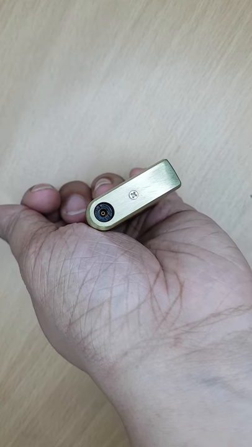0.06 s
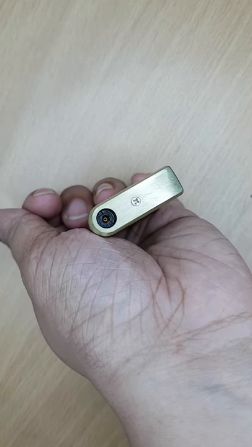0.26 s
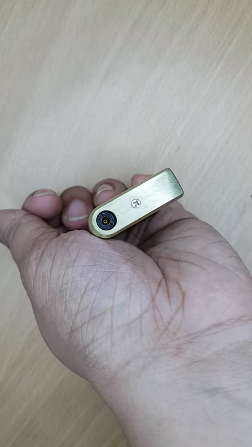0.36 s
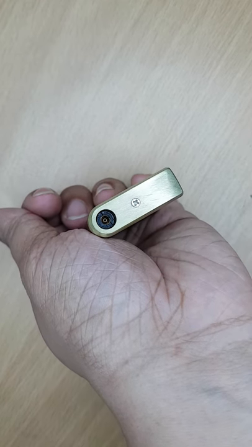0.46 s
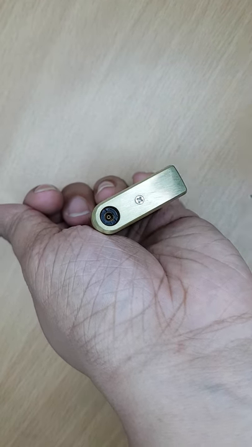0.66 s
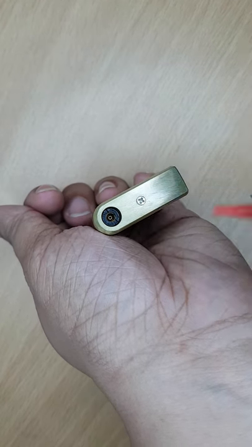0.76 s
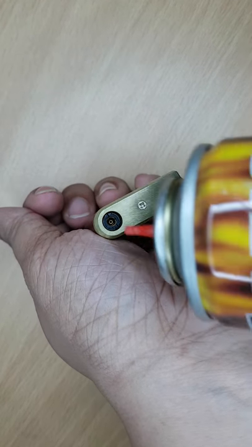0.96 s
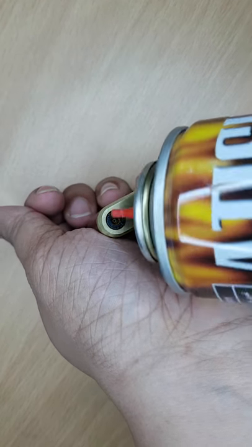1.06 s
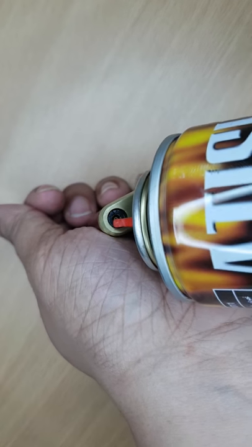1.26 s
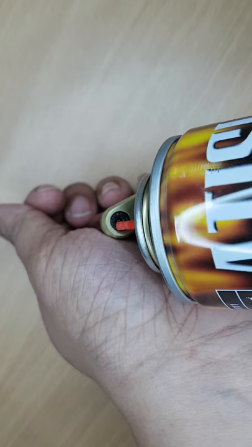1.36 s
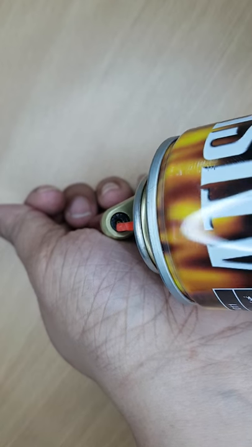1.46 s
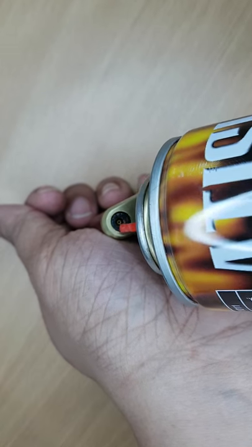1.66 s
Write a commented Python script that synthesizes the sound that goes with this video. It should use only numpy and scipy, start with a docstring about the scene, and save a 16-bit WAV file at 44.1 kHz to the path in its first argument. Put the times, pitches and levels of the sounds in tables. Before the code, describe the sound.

A gas can bumps on a wooden table, then its nozzle clicks into a metal lighter.

```python
"""A gas can judders over a wooden table, sticking and slipping in dull bumps under a thin, ringing hiss.
It takes a few hard knocks as it is picked up, and fingers rub faintly on the metal.
Its nozzle clicks into the valve of a hand-held metal lighter and ticks as it settles.
Each contact is a short push plus a decaying ring, heard close up in a small, quiet room."""
import sys
import numpy as np
from scipy import signal
from scipy.fft import rfft, irfft
from scipy.io import wavfile

SR = 44100
rng = np.random.default_rng(int(sys.argv[2]) if len(sys.argv) > 2 else 0)


def transcribe(signal):
    """Save signal, clipped to [-1, 1], as a 16-bit WAV file at the path in sys.argv[1]."""
    frames = np.atleast_2d(signal).T
    limited = np.clip(frames, -1, 1)
    pcm = np.round(limited * 32767).astype(np.int16)
    wavfile.write(sys.argv[1], SR, pcm)


N = 74970
T = np.arange(N) / SR
HZ = np.fft.rfftfreq(N, 1 / SR)
TOP_HZ = 16000

# Hits, each list with its own gain in the mix (time [s], level [dB])
TABLE_BUMPS = [(.05, -32.5), (.119, -21.5), (.131, -32), (.182, -23), (.192, -44), (.2448, -13.5),
               (.2472, -1), (.2520, -22), (.2558, 1), (.2592, -3), (.2645, -37), (.2742, -11), (.2787, -12),
               (.2822, 0), (.2846, -2), (.2872, -1.5), (.2962, -2), (.3016, -5.5), (.3095, -12),
               (.3315, -10)]
CAN_KNOCKS = [(.4019, -0.5), (0.4055, -4), (.4095, -22), (0.4171, -7), (.4245, -19), (.4444, -5.5),
              (.4482, -12.5)]
RIM_TICKS = [(.4022, -4), (.4108, -0.5), (.4236, -2), (.4446, -8)]
NOZZLE_CLICKS = [(1.0965, -1.5), (1.0979, -27), (1.0993, -12), (1.1014, -13)]
PALM_NUDGES = [(1.243, -1.5), (1.254, 0.5), (1.268, -3), (1.305, -3.5)]
SEAT_TICKS = [(1.3675, 4.5), (1.3695, 0), (1.605, -5)]
# Envelope of the rim's hiss on the wood (time [s], level [dB])
SLIDE_ENVELOPE = [(.235, -68), (.254, -47), (.28, -48), (.303, -44), (.318, -53), (.36, -60), (.4, -71)]
# Swells of finger rub (centre [s], half width [s], level [dB])
FINGER_RUBS = [(0.51, 0.057, -64.5), (0.984, 0.054, -78), (1.056, 0.1, -66.5), (1.403, 0.021, -81)]
# Resonances of the struck parts (frequency [Hz], level [dB], t60 [s], left minus right [dB])
TABLE_MODES = [(226, -13.5, 0.15, 2), (244, -7, 0.54, 2), (339, -22, 0.091, 13), (380, -3, 0.25, 1),
               (447, -9.5, 0.13, 8), (460, -11.5, 0.19, -10), (567, -8.5, 0.062, 9), (611.5, 0, 0.12, -1.5),
               (694, -19.5, .14, -9), (832, -20.5, 0.17, 7), (929, -10.5, 0.092, 3), (1028, -13, 0.15, -8),
               (1196, -36, 0.12, 14), (1862, -20, 0.078, -20)]
RIM_MODES = [(1863, 0.5, 0.068, 9), (3030, -9, 0.019, -19), (3950, -13, 0.046, -12), (5950, -10, 0.093, -6),
             (8230, -2, 0.028, -2)]
CAN_MODES = [(210.6, -3.5, 0.34, 3), (219.3, -0.5, 0.15, 0), (353.7, -6, 0.13, 5.5), (506, -7.5, 0.24, 0),
             (588, -7, 0.13, 4), (703, -0.5, 0.11, -5), (813, -4.5, 0.1, 7), (1241, -17, 0.16, -24),
             (1568, -20, 0.27, 8), (1638, -28, 0.2, 11), (1860, -22.5, 0.11, -7), (2246, -3.5, 0.043, -9.5),
             (2516, -29, 0.023, -6), (3500, -28, 0.011, -10)]
NOZZLE_MODES = [(304, -14, 0.036, -4), (395, -28, 0.67, -1), (506, -23, 0.098, 7), (660, -22, .06, 7),
                (817, -9, 0.096, 15), (954, -3.5, 0.072, 14), (1700, -3, .1, 15), (1729, 4, 0.087, -14),
                (2145, -4, 0.074, -21.5), (2220, -20, .06, -16), (2930, -6, 0.05, 6), (3216, -1, 0.025, -7),
                (3830, -8, 0.019, 8), (5893, -14, 0.08, -16), (6630, -12, 0.03, 33), (8450, -15, 0.05, 2)]
SEAT_MODES = [(2640, -20, 0.025, 3), (3960, 2, .02, -13), (7550, 3, 0.013, -10), (8350, -11, 0.013, -8)]
# Tone colour of the air and of each contact (frequency [Hz], relative level [dB])
AIR_COLOUR = [(15, -50), (25, -41), (43, -8), (64, -6), (110, -3.5), (156, -6), (188, -3.5), (260, -10.5),
              (331, -9.5), (537, -15.5), (598, -12), (970, -14.5), (1530, -17), (1710, -17.5),
              (2170, -19.5), (2700, -23.5), (4750, -28.5), (9810, -43), (15500, -36.5)]
TABLE_COLOUR = [(60, -52), (140, -7), (230, 6.5), (500, 0), (1100, -12), (1600, -31), (2400, -29),
                (4500, -33), (9000, -63), (16000, -57)]
SLIDE_COLOUR = [(200, -19), (1500, 15), (3000, 8.5), (5000, -2), (7600, -4), (8400, -9), (9200, -12),
                (11000, -4.5), (13500, -6.5), (16000, -12)]
CAN_COLOUR = [(60, -15), (160, -1), (400, 0.5), (700, 3), (1200, -3.5), (2350, -4), (2850, -22),
              (3700, -20.5), (4700, -35), (9000, -39), (16000, -58)]
RIM_COLOUR = [(200, -11), (2000, 11), (4800, -6), (6800, 2), (8800, -13.5), (10500, -6), (13000, -9),
              (16000, -14)]
RUB_COLOUR = [(200, -23), (2000, 8), (4500, -6), (6500, 2), (8500, -11), (11000, -7.5), (13500, -5),
              (16000, -13)]
NOZZLE_COLOUR = [(80, -53), (250, -25), (500, 4), (800, 4.5), (1250, -26), (1900, 11), (2700, -9.5),
                 (3500, -4), (4900, -7), (6600, -6), (7800, -17.5), (11000, -22), (15000, -24),
                 (16500, -29)]
RADIATED_COLOUR = [(100, -1), (400, 4.5), (800, 5.5), (1300, 0), (2000, 0.5), (2700, -5), (3400, -1),
                   (5000, -12.5), (6700, -12.5), (8500, -22.5), (15000, -36)]  # the click the whole can sends into the room
NUDGE_COLOUR = [(100, -35), (300, -6.5), (700, -3.5), (1200, -26.5), (3000, -12), (16000, -45)]
TICK_COLOUR = [(200, 14), (1500, -2), (2600, 11), (5500, -4), (7500, -1.5), (9200, -14), (11000, -3),
               (15500, -8)]
# Stereo likeness of air, contact noise and reverb (frequency [Hz], left-right correlation [-1 to 1])
AIR_LIKENESS = [(60, 0.75), (130, 1), (290, 0.81), (640, 0.55), (1400, 0), (16000, 0.051)]
CONTACT_LIKENESS = [(200, 0.87), (500, 1), (900, 0.3), (1500, -0.49), (3000, -0.34), (16000, 0.16)]
REVERB_LIKENESS = [(200, 0.85), (600, 0.75), (1400, 0), (16000, 0)]
# Stereo balance of the room and of contact noise (frequency [Hz], left minus right [dB])
ROOM_PAN = [(60, 0), (200, 1), (400, -2), (1300, -0.5), (2400, -4.5), (4400, -3), (8000, -1.5), (15000, .5)]
CONTACT_PAN = [(200, -1), (700, -0.5), (1800, -1), (3000, -5), (6000, 0.5), (8500, -9.5), (13000, 3.5)]
# Reverb decay by band (frequency [Hz], t60 [s])
ROOM_T60 = [(150, 0.24), (500, 0.29), (1200, 0.46), (3000, 0.55), (7000, 0.36), (16000, 0.6)]


def amp(db):
    """Decibels to gain."""
    return 10 ** (np.asarray(db) / 20)


def curve(points, hz=HZ):
    """A table interpolated on a log-frequency axis."""
    frequency, value = np.transpose(points)
    return np.interp(np.log(hz + 1), np.log(frequency + 1), value)


def unit(x):
    """Scales to a mean energy of one per channel."""
    return x / np.sqrt(np.mean(np.sum(x ** 2, -1)) + 1e-20)


def fade(t60):
    """Exponential decay, 60 dB down after t60 seconds."""
    return np.exp(-np.log(1000) * T / t60)


def pan(db):
    """Left and right gains, db apart."""
    return amp(np.array([[.5], [-.5]]) * db)


def convolve(a, b):
    """Convolution cut to the length of the scene."""
    return signal.fftconvolve(np.atleast_2d(a), np.atleast_2d(b), axes=1)[:, :N]


def noise(colour, likeness=CONTACT_LIKENESS, balance=CONTACT_PAN):
    """Stereo noise of rms one with a given colour, likeness and balance."""
    left, independent = rfft(rng.standard_normal((2, N)))
    correlation = np.clip(curve(likeness), -1, 1)
    right = correlation * left + np.sqrt(1 - correlation ** 2) * independent
    spectrum = np.array([left, right]) * amp(curve(colour)) * pan(curve(balance))
    return unit(irfft(spectrum, N)) * np.sqrt(N)


def pulse(colour):
    """The attack of a hit: one minimum-phase push with the given colour."""
    hz = abs(np.fft.fftfreq(4096, 1 / SR))
    log_gain = np.log(amp(curve(colour, hz)))
    spectrum = np.exp(np.conj(signal.hilbert(log_gain)))
    return unit(np.fft.ifft(spectrum).real)


def ring(modes):
    """Damped sines of a struck object."""
    return -sum(amp(db) * pan(side) * fade(t60) * np.sin(2 * np.pi * hz * T)
                for hz, db, t60, side in modes)


def from_left(x, leftward):
    """Sound from the left reaches the right channel later, by 0.88 ms at leftward = 1."""
    delay_s = np.array([[0], [leftward * 0.00088]])
    return irfft(rfft(x) * np.exp(-2j * np.pi * HZ * delay_s), N)


def add(mix, start_s, sound):
    """Lays a sound into the mix."""
    part = mix[:, round(start_s * SR):][:, :sound.shape[-1]]
    part += sound[..., :part.shape[1]]


def strike(hits, colour, push_db, wash_db, wash_t60, leftward,
           modes=(), modes_db=0, band_hz=(150, TOP_HZ)):
    """Each hit is a push, any clear modes of the object and a short wash of its dense modes."""
    direct, wash = np.zeros((2, N)), np.zeros((2, N))
    push = pulse(colour)
    body = ring(modes) * np.ones((2, N))
    grain = noise(colour)
    decay = unit(fade(wash_t60))
    for start_s, db in hits:
        add(direct, start_s, -amp(db + push_db) * push)
        add(direct, start_s, amp(db + modes_db) * body)
        fresh_grain = np.roll(grain, rng.integers(N), axis=1)
        add(wash, start_s, amp(db + wash_db) * decay * fresh_grain)
    # Size limits the bass, softness the treble.
    band = signal.butter(3, band_hz, "band", fs=SR, output="sos")
    return signal.sosfilt(band, from_left(direct, leftward) + wash)


def reverb(x, onset_s=0.0051):
    """A small room's tail, each band dying at its own speed."""
    white = rfft(noise([(20, 0), (20000, 0)], REVERB_LIKENESS, ROOM_PAN))
    centres_hz, t60s = np.transpose(ROOM_T60)
    tail = np.zeros((2, N))
    for weights, t60 in zip(np.eye(len(t60s)), t60s):
        band = curve(list(zip(centres_hz, weights)))
        tail += irfft(white * band, N) * fade(t60)
    build_up = np.minimum(T / onset_s, 1) ** 2
    return convolve(x, unit(tail * build_up))


def room_tone():
    """Still air: a faint, steady bed of dark noise."""
    return amp(-57.5) * noise(AIR_COLOUR, AIR_LIKENESS, ROOM_PAN)


def judder():
    """The can sticks and slips on the table: dull bumps under a thin hiss that sets the rim singing."""
    bumps = strike(TABLE_BUMPS, TABLE_COLOUR, push_db=-11.5, wash_db=-4, wash_t60=0.18, leftward=0.31,
                   modes=TABLE_MODES, modes_db=-29.5, band_hz=(211, 2480))
    hiss = noise(SLIDE_COLOUR)
    singing = amp(-7) * convolve(rng.standard_normal((2, N)), unit(ring(RIM_MODES)))
    envelope = amp(np.interp(T, *np.transpose(SLIDE_ENVELOPE), left=-120, right=-120))
    return bumps + amp(-9) * reverb(bumps) + (hiss + singing) * envelope


def knocks():
    """The can knocks and rebounds: a hollow body with bright rim ticks on top."""
    body = strike(CAN_KNOCKS, CAN_COLOUR, push_db=-10.5, wash_db=-1, wash_t60=0.13, leftward=0.1,
                  modes=CAN_MODES, modes_db=-31, band_hz=(144, 4100))
    rim = strike(RIM_TICKS, RIM_COLOUR, push_db=-44, wash_db=-24, wash_t60=0.017, leftward=0.21)
    return body + rim + amp(-10.5) * reverb(body + rim)


def fingers():
    """Skin slides on metal in soft swells."""
    swells = sum(amp(db) * np.exp(-((T - centre) / width) ** 2) for centre, width, db in FINGER_RUBS)
    return noise(RUB_COLOUR) * swells


def nozzle():
    """The nozzle snaps into the valve in a tight cluster of clicks; the can radiates into the room."""
    click = -strike(NOZZLE_CLICKS, NOZZLE_COLOUR, push_db=-11, wash_db=-3.5, wash_t60=0.038,
                    leftward=0.268, modes=NOZZLE_MODES, modes_db=-32.5, band_hz=(210, 15500))
    radiated = strike(NOZZLE_CLICKS[:1], RADIATED_COLOUR, push_db=-9, wash_db=-37, wash_t60=0.02,
                      leftward=0)
    return click + reverb(radiated + amp(-20) * click)


def settling():
    """The lighter shifts softly in the palm and the nozzle ticks in its seat."""
    ticks = strike(SEAT_TICKS, TICK_COLOUR, push_db=-50, wash_db=-33.5, wash_t60=0.0094, leftward=0.14,
                   modes=SEAT_MODES, modes_db=-66.5)
    nudges = strike(PALM_NUDGES, NUDGE_COLOUR, push_db=-30.5, wash_db=-24, wash_t60=0.047,
                    leftward=0.14, band_hz=(150, 2550))
    return ticks + nudges + amp(-3.5) * reverb(ticks + nudges)


def scene():
    """Can, lighter and fingers over the room tone."""
    return judder() + knocks() + nozzle() + settling() + fingers() + room_tone()


def record(dry):
    """A steep low-pass takes the very top off the mix."""
    low_pass = signal.firwin(511, TOP_HZ, window=("kaiser", 9), fs=SR)
    return signal.oaconvolve(dry, low_pass[None], "same")


dry = scene()
out = record(dry)
transcribe(out)
```